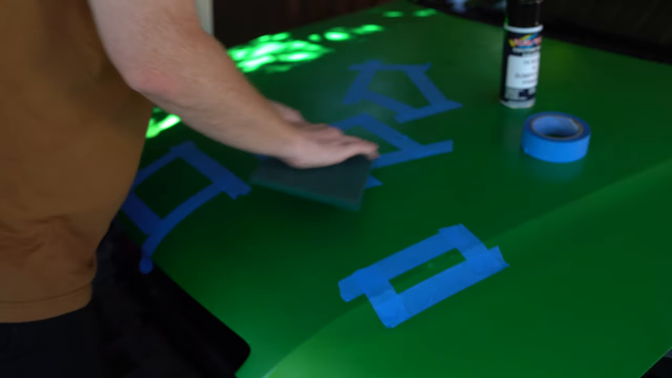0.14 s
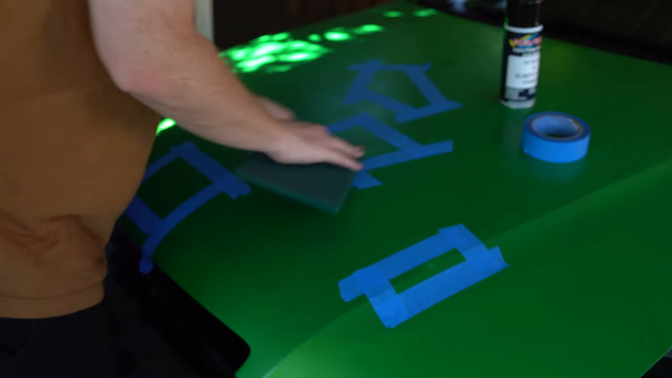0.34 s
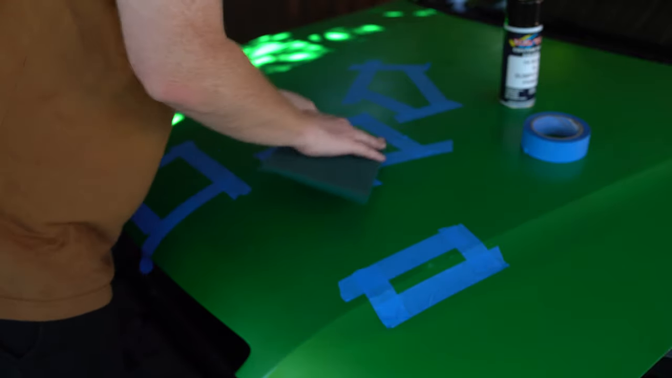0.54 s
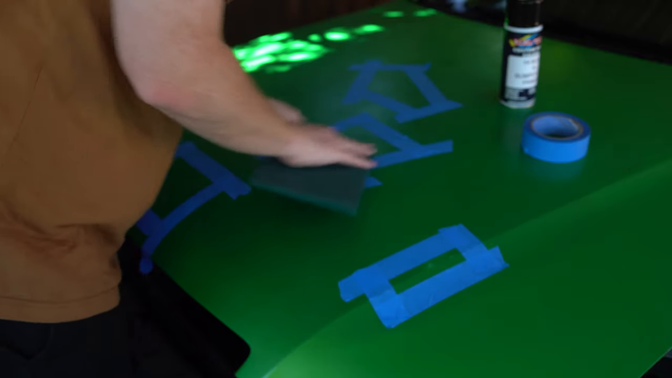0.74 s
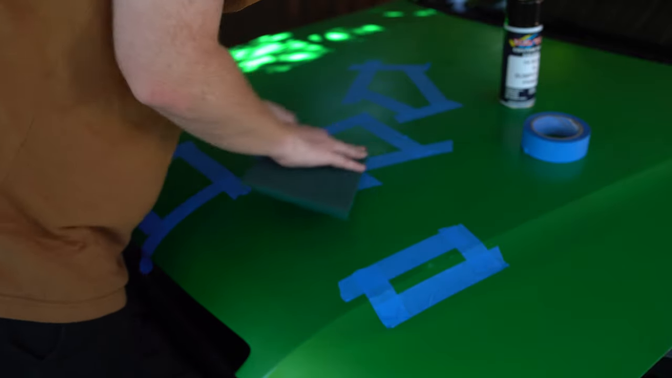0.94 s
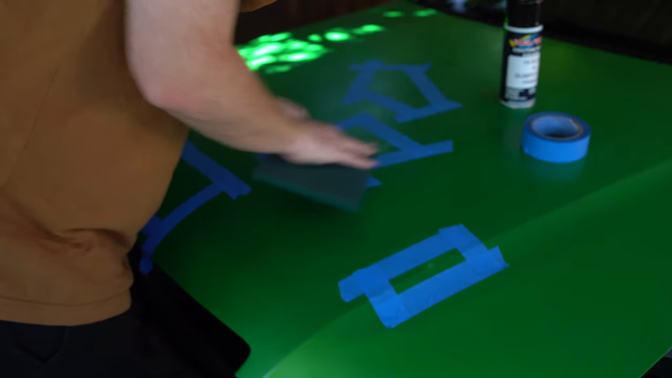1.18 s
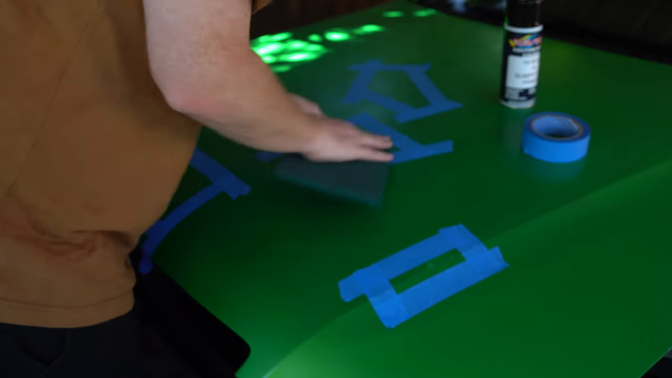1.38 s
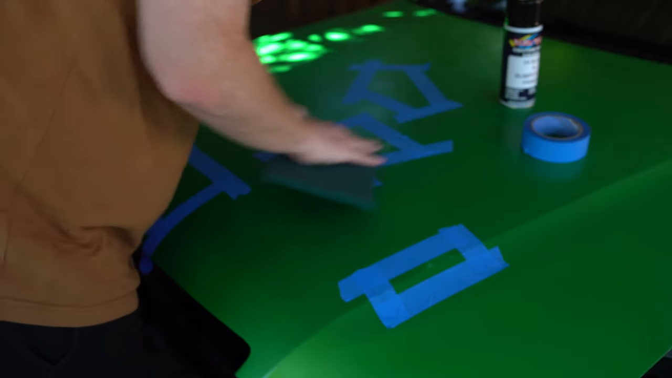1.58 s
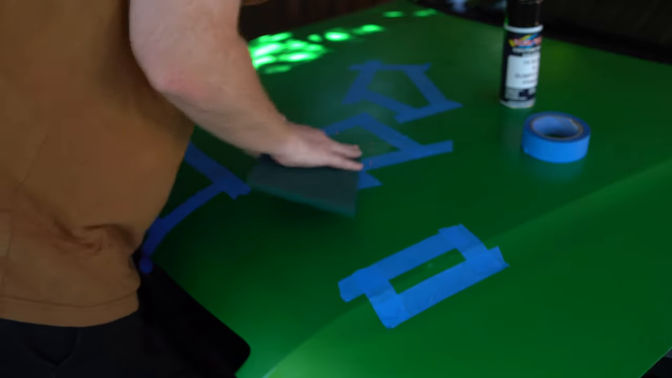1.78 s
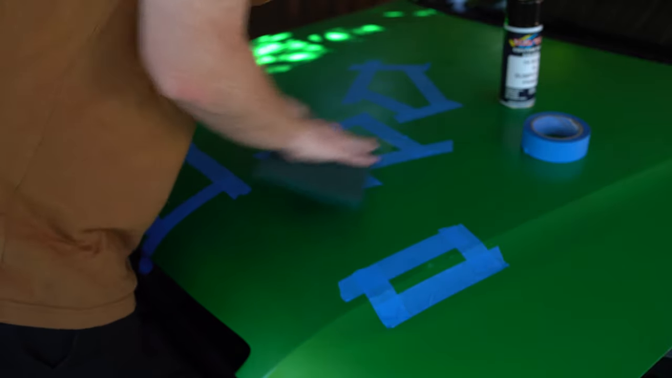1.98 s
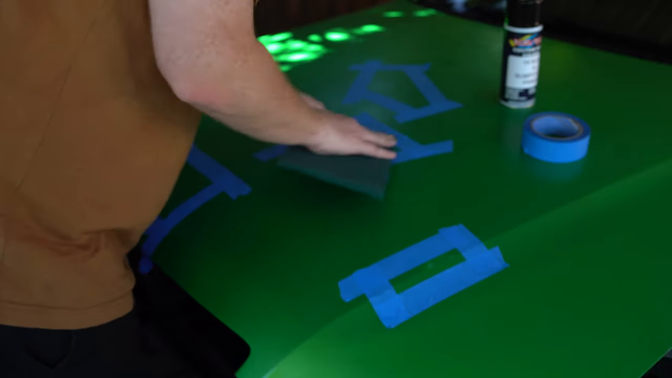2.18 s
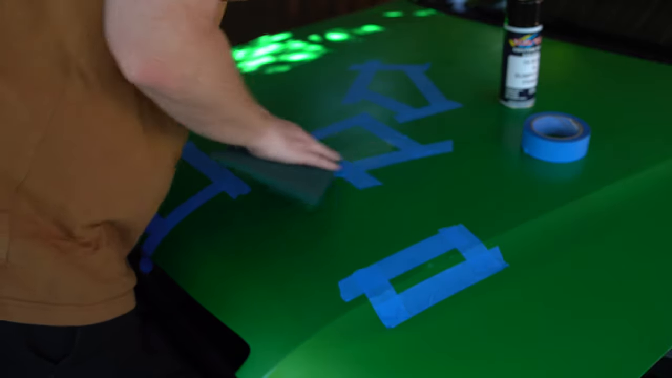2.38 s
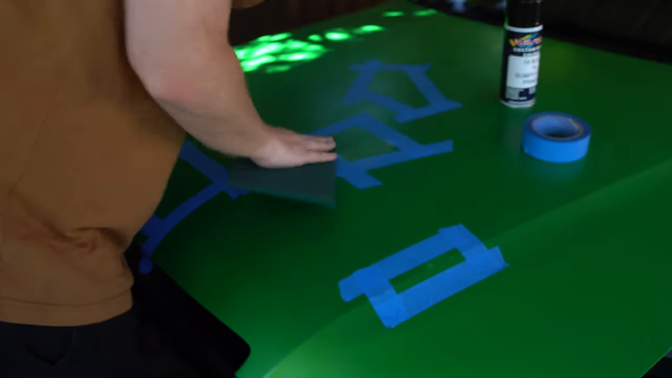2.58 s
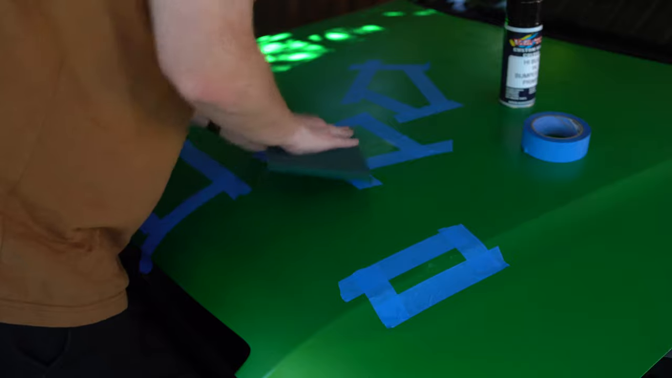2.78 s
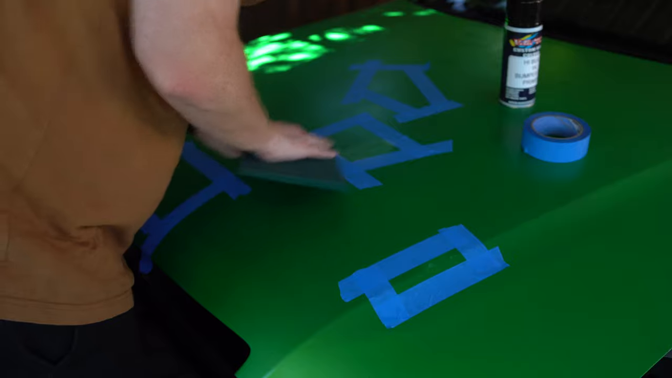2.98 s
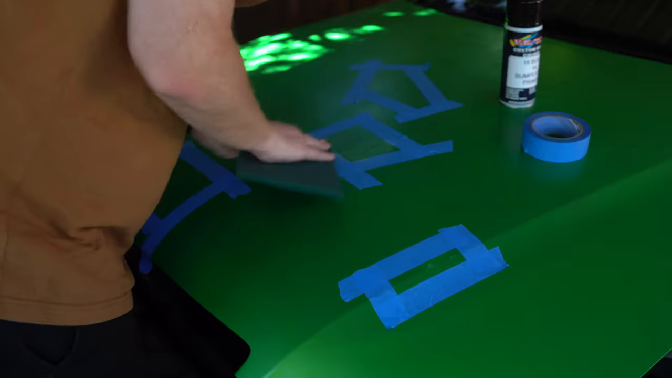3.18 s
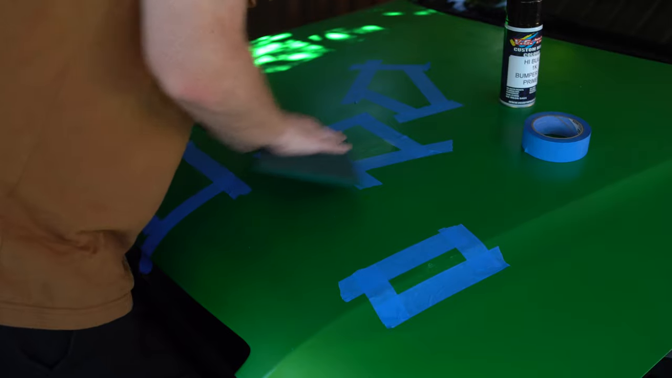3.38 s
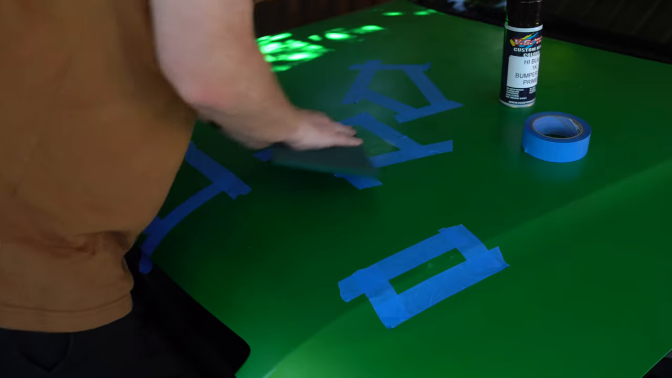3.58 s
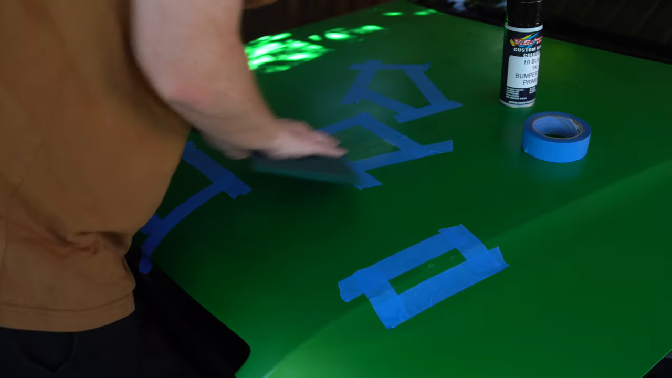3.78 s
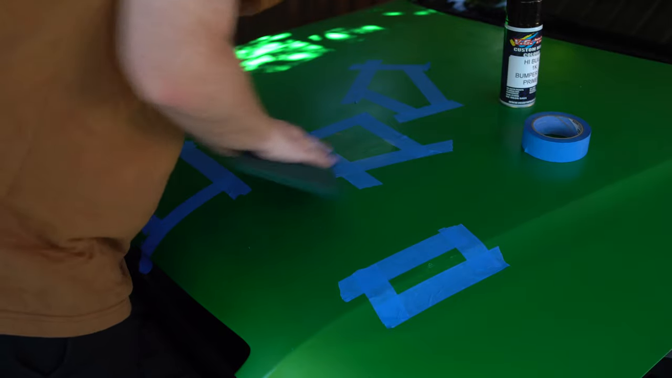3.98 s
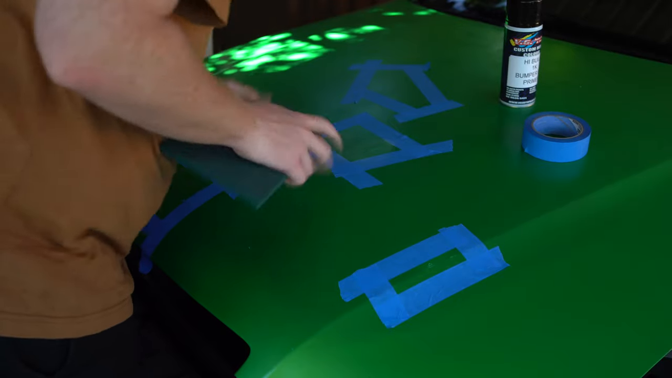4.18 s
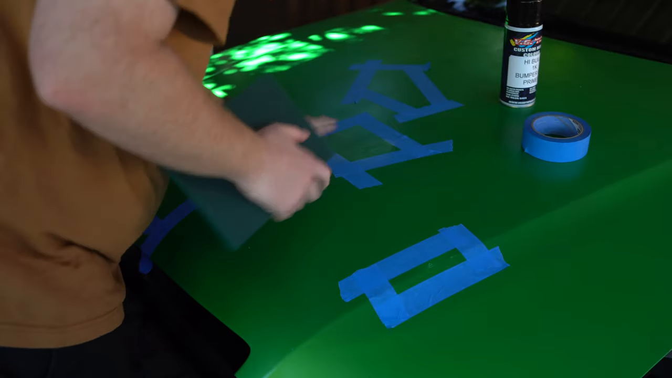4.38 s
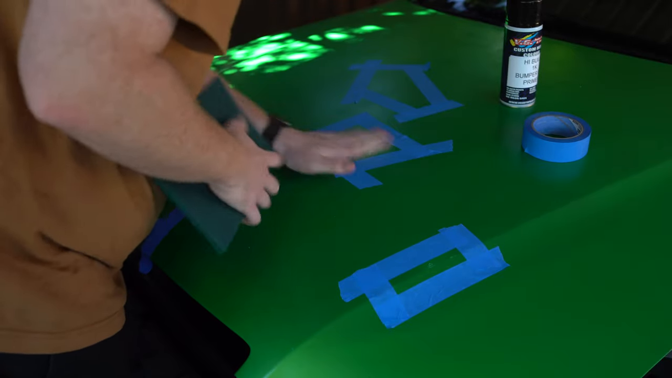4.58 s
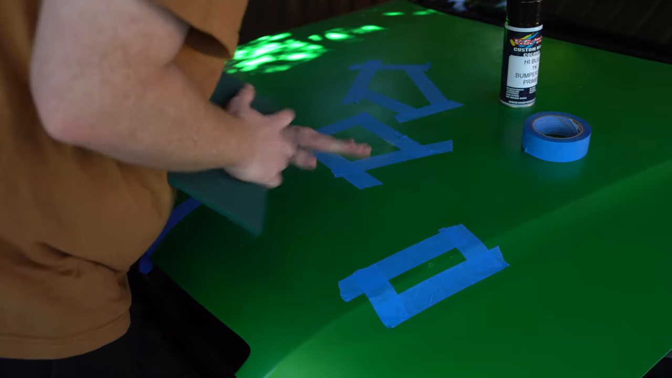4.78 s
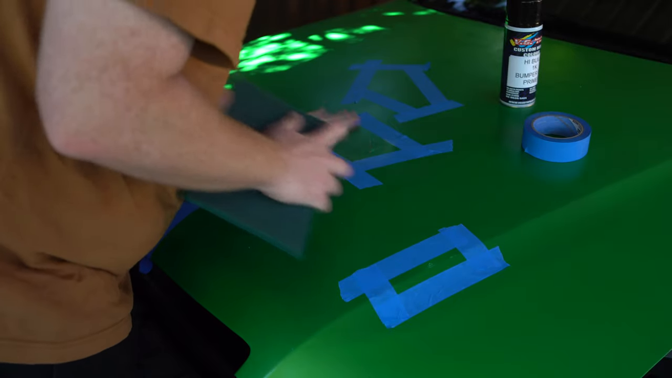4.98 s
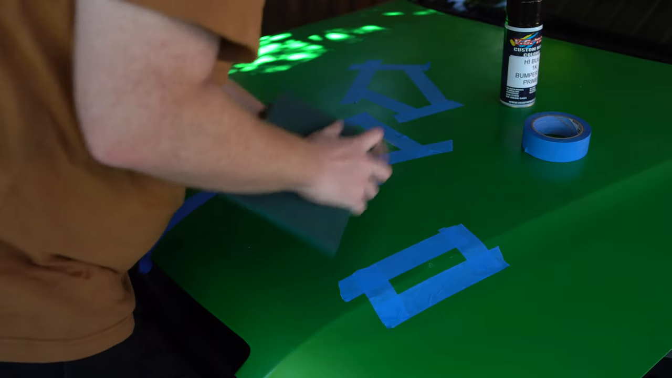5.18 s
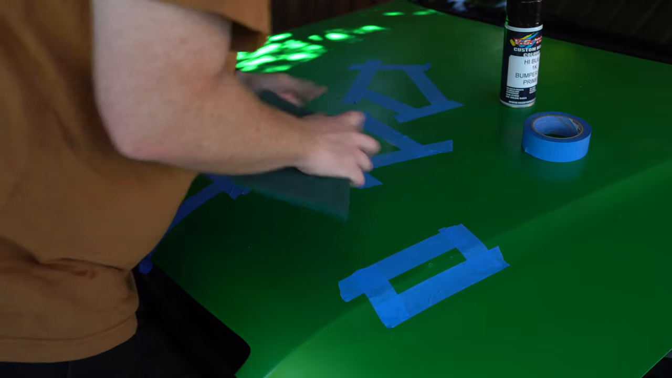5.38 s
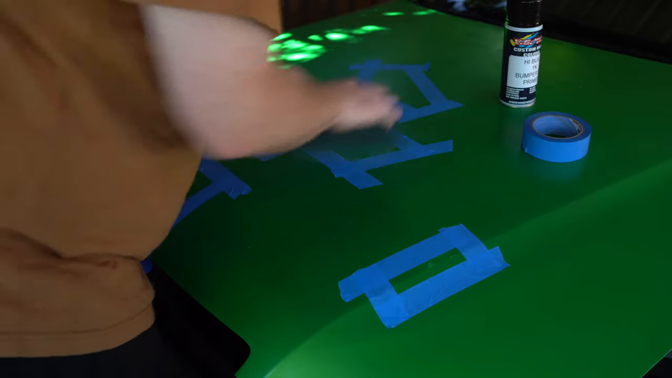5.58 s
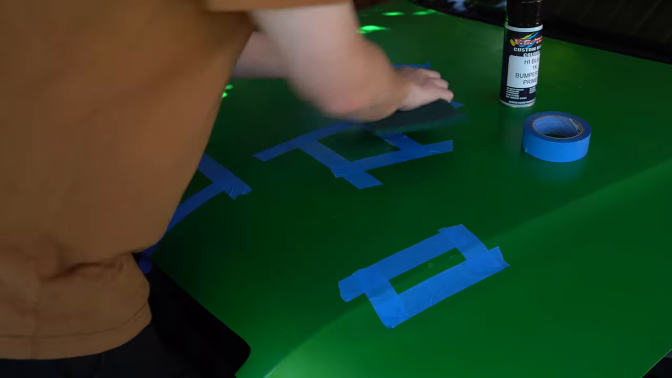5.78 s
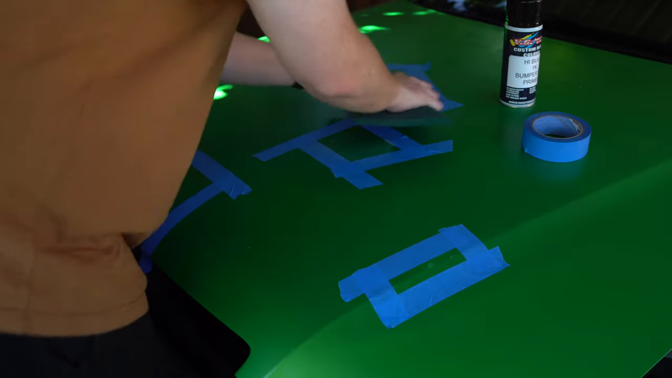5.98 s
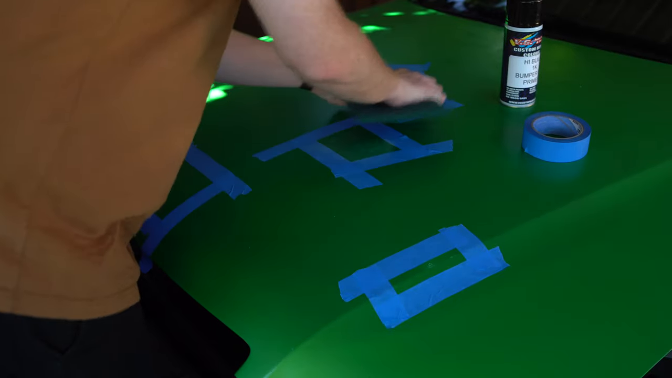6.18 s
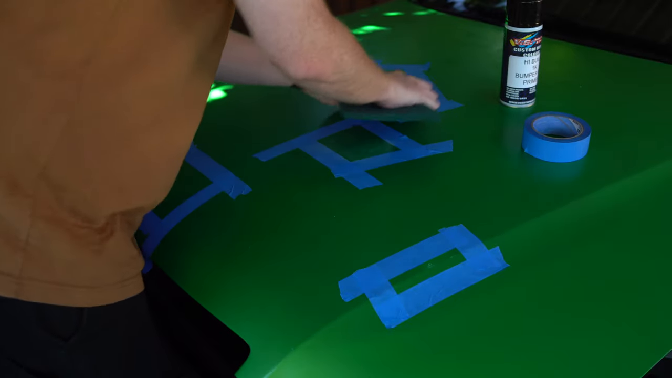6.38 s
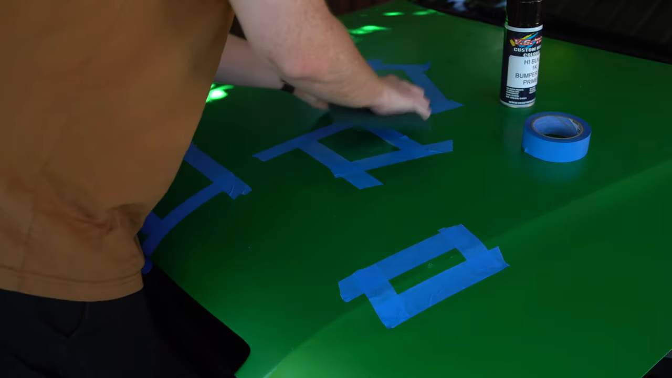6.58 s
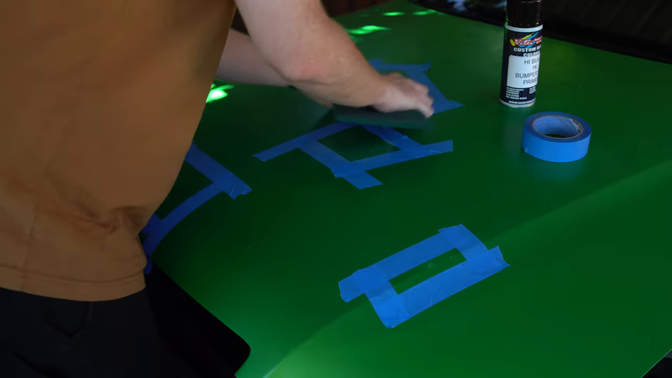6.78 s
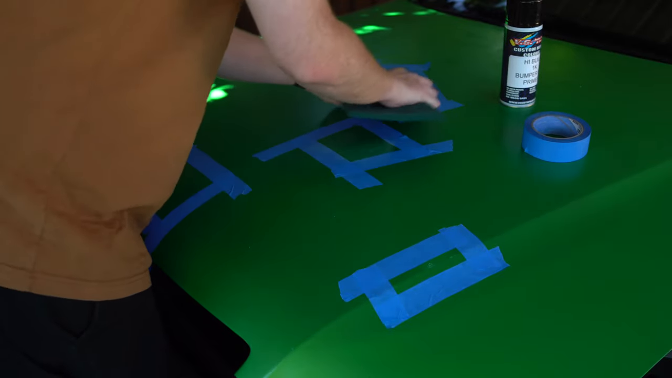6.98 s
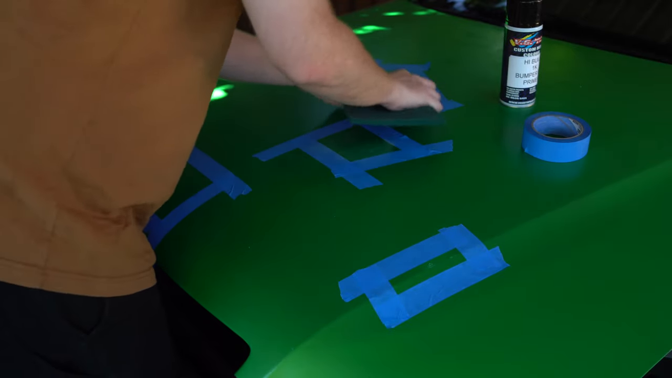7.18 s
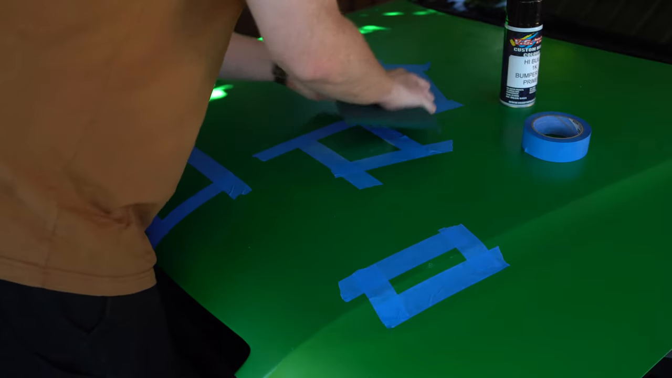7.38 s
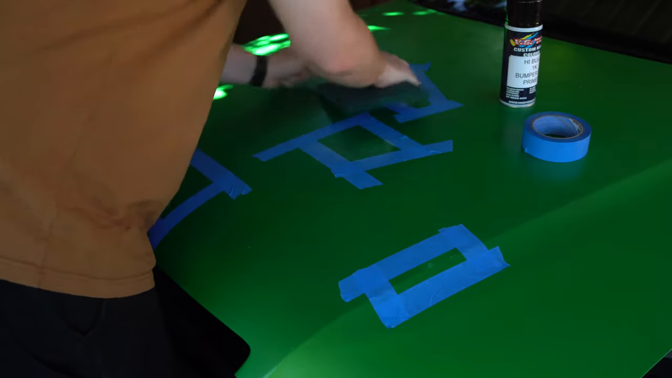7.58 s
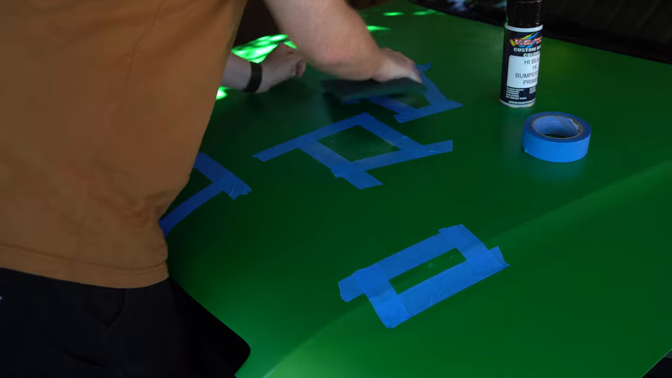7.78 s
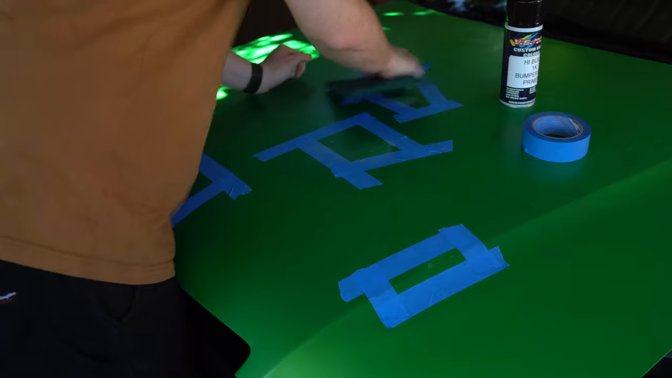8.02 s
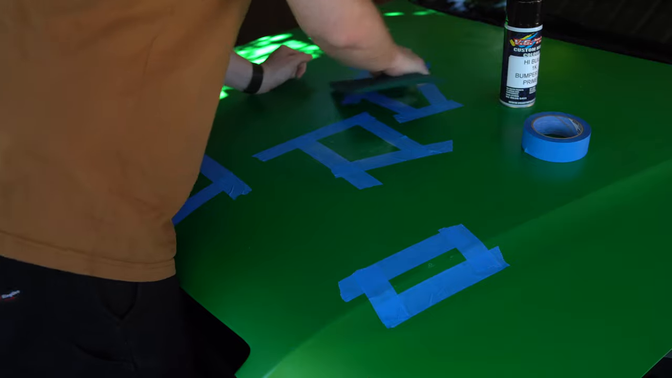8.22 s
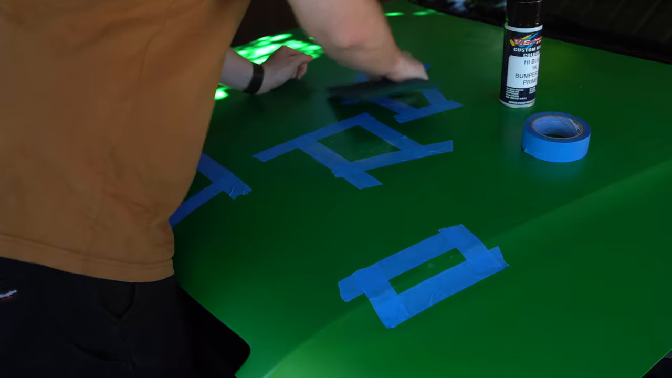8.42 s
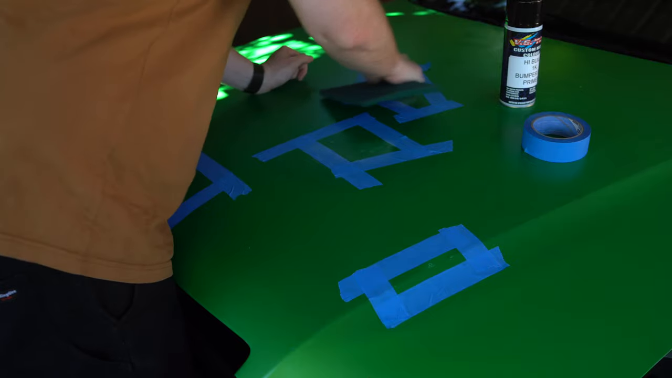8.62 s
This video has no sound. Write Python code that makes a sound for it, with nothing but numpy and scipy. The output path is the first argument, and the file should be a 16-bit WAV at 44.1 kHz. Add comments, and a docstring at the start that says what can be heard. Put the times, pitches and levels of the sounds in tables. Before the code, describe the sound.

Very close, a hand scrubs an abrasive pad to and fro on a painted steel panel, about seven dry, hissing strokes a second with a low hollow drone. After four seconds the pad lifts, a palm wipes softly and fingers tap; scrubbing resumes farther off, pauses briefly and returns. Air from the moving arm thumps and rumbles on the stereo microphone, sometimes clipping, over a faint steady workshop hush.

```python
"""In a workshop, a hand rubs an abrasive pad to and fro over a painted sheet-steel panel, close to two
microphone ports. Each stroke hisses as coloured, grainy noise, scratches in one resonant band and drives the
panel's modes into a drone. Between two patches the pad is lifted and a hand wipes the dust off; a few taps,
faint squeaks and a brief low ring of the sheet stand out. Air stirred by the arm buffets the ports with surges,
puffs and flutter, strongly enough to clip. Behind it lie the short answer of the walls and the steady hush of
the shop."""
import sys
import numpy as np
from scipy import signal
from scipy.fft import rfft, irfft, next_fast_len
from scipy.io import wavfile
from scipy.ndimage import uniform_filter1d, map_coordinates

SR = 44100
rng = np.random.default_rng(int(sys.argv[2]) if len(sys.argv) > 2 else 0)


def store_wav(level_fs):
    """Save 16-bit WAV to argv[1]."""
    pcm = np.round(np.clip(np.atleast_2d(level_fs), -1, 1) * 32767)
    wavfile.write(sys.argv[1], SR, pcm.T.astype(np.int16))


N = 381465

# strokes of the pad, pull and push in turn: (start [s], end [s], hiss [dB], drone over hiss [dB])
PAD_STROKES = [(0.0, 0.113, -54.5, 4), (0.153, 0.265, -49, 5), (0.289, 0.404, -48.5, 1.5),
               (0.447, 0.56, -46, 6.5), (0.597, 0.708, -50, -0.5), (0.744, 0.854, -46, 2.5),
               (0.883, 0.99, -50, 4), (1.026, 1.129, -46.5, 2.5), (1.16, 1.266, -48.5, 3),
               (1.3, 1.402, -44.5, 3.5), (1.434, 1.545, -50, 3), (1.575, 1.68, -46.5, 5.5),
               (1.701, 1.815, -49.5, 6), (1.841, 1.957, -47, 5.5), (1.972, 2.081, -50.5, 4.5),
               (2.11, 2.234, -46.5, 2.5), (2.254, 2.418, -51, 5.5), (2.701, 2.815, -47.5, 4.5),
               (2.841, 2.95, -46, 2.5), (2.998, 3.103, -44.5, 8), (3.129, 3.224, -47.5, 4.5),
               (3.267, 3.365, -47, 7.5), (3.386, 3.485, -48, 1.5), (3.527, 3.628, -46, 6.5),
               (3.65, 3.764, -47.5, 7.5), (3.791, 3.9, -45.5, 8.5), (3.931, 4.055, -48, -1),
               (5.807, 5.914, -56.5, -15), (5.931, 6.036, -53, 8), (6.095, 6.18, -50, 13.5),
               (6.217, 6.308, -50, 11.5), (6.372, 6.466, -51, 14.5), (6.497, 6.577, -49.5, 13),
               (6.641, 6.733, -51, 11.5), (6.766, 6.856, -52, 9.5), (6.901, 6.98, -49.5, 12.5),
               (7.005, 7.126, -54, 11.5), (7.141, 7.212, -54, 16), (7.222, 7.355, -55.5, 8.5),
               (7.803, 7.885, -52, 9), (7.905, 8.0, -49.5, 13.5), (8.033, 8.13, -47, 11),
               (8.155, 8.243, -46.5, -5), (8.262, 8.372, -47.5, 10), (8.397, 8.49, -48, 9.5),
               (8.515, 8.605, -48, -12), (8.63, 8.72, -49, 16.5)]
# wipes and light brushes between the strokes: (start [s], end [s], hiss [dB], hiss rise [dB],
# drone over hiss [dB], scratch resonance [Hz], its end over its start [ratio])
HAND_WIPES = [(2.588, 2.63, -63, 0.3, -1, 2050, 0.97), (4.14, 4.43, -73, 13, -3, 2390, 0.66),
              (4.436, 4.562, -54, 5, -1, 1810, 0.78), (4.553, 4.718, -53, 5.5, -0.5, 1740, 1.27),
              (4.918, 5.037, -56, 6, -2.5, 1820, 1.4), (5.067, 5.166, -55.5, 5.5, 5.5, 2230, 1.13),
              (5.644, 5.788, -69, -2, 6.5, 3100, 0.67), (7.393, 7.63, -61, 7.5, 6, 7200, 2),
              (7.641, 7.708, -59, -0.5, 11, 7440, 1.3), (7.714, 7.766, -62, 5.5, 24.5, 3400, 1)]
# when the hand takes a new hold of the pad: (time [s])
HOLD_STARTS = [0, 1.0, 2.6, 3.5, 5.7, 6.05, 6.6, 7.13, 7.5]
# each hold: (hiss rise along a pull [dB], along a push [dB], scratch resonance of a pull [Hz],
# of a push [Hz], scratch of a push over hiss [dB])
HOLDS = [(4, -0.5, 1820, 2220, -7), (0, -2, 6750, 4320, -7), (11.5, -1.5, 3200, 3170, -6.5),
         (5, -4, 3200, 8400, -9.5), (8.5, -1, 6500, 3570, -0.5), (8.5, -0.5, 6800, 6000, -6.5),
         (5.5, -2, 7000, 6300, -2.5), (0.5, -2, 6800, 5950, 7), (1, 0, 6900, 8000, -5.5)]
PULL_SCRATCH_DB, WIPE_SCRATCH_DB = -7.5, -0.5  # scratch over hiss


def contacts():
    """Every rub on the sheet, wipes first: its times, levels, resonance, glide and direction (push is 1)."""
    rubs = []
    for start, end, db, rise_db, over_db, hz, glide in HAND_WIPES:
        rubs.append(dict(start=start, end=end, hiss_db=db, rise_db=rise_db, drone_db=db + over_db,
                         scratch_hz=hz, glide=glide, scratch_db=db + WIPE_SCRATCH_DB, push=0))
    for k, (start, end, db, over_db) in enumerate(PAD_STROKES):
        push = k % 2
        hold = HOLDS[np.searchsorted(HOLD_STARTS, start, side="right") - 1]
        scratch_db = db + (hold[4] if push else PULL_SCRATCH_DB)
        rubs.append(dict(start=start, end=end, hiss_db=db, rise_db=hold[push], drone_db=db + over_db,
                         scratch_hz=hold[2 + push], glide=1, scratch_db=scratch_db, push=push))
    return rubs


# how many times more gently the pad turns on each patch, rounder at a farther reach: (factor [ratio])
TURN_EASE = [1.16, 1.2, 1.37, 2.449]


def stroke_gain(rub, level, grip_s, lift_s, bite_db, lean=1):
    """Span and gain of one stroke: the pad grips, slides fastest in the middle and slows at the turn."""
    start, end, rise_db = rub["start"], rub["end"], lean * rub["rise_db"]
    span = slice(max(0, int((start - .08) * SR)), min(N, int((end + .12) * SR)))
    t = np.arange(span.start, span.stop) / SR
    # a stroke that fades was jerked off: faster grip, and a bite as the fibres catch
    jerk = np.clip(-rise_db / 2.2, 0, 1)
    bite = bite_db * jerk * np.exp(-abs(t - start - .01) / 0.012)
    ease = TURN_EASE[np.searchsorted(PATCH_MOVES, start)]
    slow = (end - start) / .1  # a longer stroke starts more gently
    onset_s = slow * ease * grip_s * (1 - .6 * jerk)
    edge = 1 / (1 + np.exp((start - t) / onset_s)) / (1 + np.exp((t - end) / (ease * lift_s)))
    along_stroke = np.clip((t - start) / (end - start) - .5, -.5, .5)
    arch = -6 * along_stroke ** 2
    return span, amp(rub[level] + rise_db * along_stroke + arch + bite) * edge


# when the hand changes its patch: (time [s])
PATCH_MOVES = [4.1, 5.92, 7.4]


def patch_gains(level, **shape):
    """Gain over time of the named level, as (pull or push, patch of the panel, sample)."""
    gains = np.zeros((2, len(PATCH_MOVES) + 1, N))
    for rub in contacts():
        span, gain = stroke_gain(rub, level, **shape)
        gains[rub["push"], np.searchsorted(PATCH_MOVES, rub["start"]), span] += gain
    return gains


# hiss colours at the near patch, of the wiping hand, at the far patch and beside it:
# (frequency [Hz], relative density [dB per Hz])
NEAR_COLOUR = [(900, -2), (2230, -1.5), (2770, -5.5), (3160, -5), (3730, -8.5), (4100, -5.5), (4900, -8),
               (7740, -8.5), (12200, -14), (15700, -24.5)]
WIPE_COLOUR = [(1000, 0.5), (1820, -3.5), (3550, -9), (7940, -12), (13000, -19.5), (15700, -29)]
FAR_COLOUR = [(900, 15.5), (1400, 9.5), (2500, 2), (4850, -2), (5900, 3.5), (7000, 1), (11000, -4),
              (15700, -12)]
BESIDE_COLOUR = [(900, 1), (1560, -7), (3080, -10.5), (8510, -13.5), (10900, -13), (15700, -31.5)]


def hiss():
    """Countless grit contacts: noise with dense grains, coloured by the hand over the pad."""
    grains = amp(1.2 * wobble(900) + .7 * wobble(40))
    grit = unit(patchy(patchy_db=2) * grains)
    gains = patch_gains("hiss_db", grip_s=0.0039, lift_s=0.0064, bite_db=0.0).sum(axis=0)
    band = lambda hz: (hz > 2500) & (hz < 13000)  # hiss levels count this band
    out = 0
    for gain, points in zip(gains, (NEAR_COLOUR, WIPE_COLOUR, FAR_COLOUR, BESIDE_COLOUR)):
        colour = closed(points)
        out = out + gain * filtered(grit, colour) / unit_gain(lambda hz: band(hz) * colour(hz))
    return out


SCRATCH_SCATTER = .035  # spread of the resonance from stroke to stroke, as a share


def scratch():
    """The gap between hand, pad and paint favours one band, set by the hold on the pad; in a wipe it slides."""
    out, grit, rubs = np.zeros((2, N)), patchy(patchy_db=3.5), contacts()
    for k, (rub, luck) in enumerate(zip(rubs, rng.standard_normal(len(rubs)))):
        is_wipe = k < len(HAND_WIPES)
        lean = .3 if is_wipe else 1  # the rasp of a palm comes at once
        span, gain = stroke_gain(rub, "scratch_db", grip_s=.003, lift_s=.012, bite_db=6, lean=lean)
        t = np.arange(span.start, span.stop) / SR
        place = np.clip((t - rub["start"]) / (rub["end"] - rub["start"]), 0, 1)
        stops = 5 if is_wipe else 1  # a sliding band crossfades through several resonances
        band = 0
        for stop in np.linspace(0, 1, stops):
            share = np.sqrt(np.clip(1 - (stops - 1) * abs(place - stop), 0, 1))
            hz = rub["scratch_hz"] * rub["glide"] ** (stop - .5) * np.exp(SCRATCH_SCATTER * luck)
            b, a = signal.iirpeak(hz, 2 + 7500 / hz, SR)  # low scratches squeak more sharply
            once = signal.lfilter(b, a, grit[:, span])
            band = band + share * signal.lfilter(b, a, once)
        out[:, span] += gain * unit(band)
    return out


# panel modes: (frequency [Hz], width [Hz], drive from each of the four patches [dB] x 4,
# change in a full push [dB])
PANEL_MODES = [(210, 240, -1.5, 2, -7, 0, -4.5), (355, 112, 5, 7, -1, 0.5, -1.5),
               (418.7, 55.6, 4.5, 10.5, 2.5, 0, -0.3), (558, 113, 0, 1, -2.5, -3.5, -1),
               (702, 107, 0.5, 5.5, -6, -6.5, 2.5), (870, 290, -4, -1, -10.5, -28, 1),
               (967, 21, -8, -22, -5, -28.5, 0.5)]
PUSH_SHARE = 0.9  # share of a full push's change that is used
# fingers or pad land on the sheet: (time [s], peak of the push on the sheet [dB])
SHEET_TAPS = [(4.416, -35), (4.635, -37), (4.917, -32), (5.884, -34), (8.037, -29)]


def panel_response(hz, patch, push):
    """The sheet as a row of resonances of alternating sign, driven from one patch."""
    total = 0
    for n, mode in enumerate(PANEL_MODES):
        centre, width = mode[:2]
        gain = (-1) ** n * amp(mode[2 + patch] + push * mode[-1])
        total = total + gain * 1j * hz * width / (centre ** 2 - hz * hz + 1j * hz * width)
    return total


def drone():
    """The drag shakes the sheet unevenly, taps knock it, and its modes answer."""
    gains = patch_gains("drone_db", grip_s=0.013, lift_s=0.017, bite_db=4.0, lean=2.32)
    t, taps = np.arange(N) / SR, np.zeros_like(gains[0])
    for at, db in SHEET_TAPS:
        decay_db = 60 * abs(t - at) / 0.25
        taps[np.searchsorted(PATCH_MOVES, at)] += amp(db - decay_db) * (t > at)
    flesh = lambda hz: 1 / (1 + 1j * hz / 450) ** 2  # a soft contact reaches mainly the low modes
    drag = unit(patchy(patchy_db=2) * amp(1.2 * wobble(30)))
    out = 0
    for patch, (pull, push) in enumerate(zip(*gains)):
        pull_sheet = lambda hz: panel_response(hz, patch, 0)
        push_sheet = lambda hz: panel_response(hz, patch, PUSH_SHARE)
        knocks = filtered(taps[patch] * drag, flesh)
        pulled = filtered(pull * drag + knocks, pull_sheet)
        pushed = filtered(push * drag, push_sheet)
        out = out + (pulled + pushed) / unit_gain(pull_sheet)
    return out


# faint narrow tones, squeaks of the pad and a low ring of the sheet at 220 Hz: (start [s], end [s], centre
# frequency [Hz], peak before flicker [dB])
FAINT_TONES = [(.03, .14, 1700, -54), (.27, .39, 1690, -55), (2.5, 2.59, 2620, -66),
               (7.41, 7.62, 220, -52)]


def faint_tones():
    """Faint wavering tones that swell and fade: slips of the pad at a nearly steady rate, and at 7.4 s a low
    ring of the sheet."""
    t, out = np.arange(N) / SR, np.zeros(N)
    drift = np.cumsum(wobble(120)) / SR
    flicker = amp(4 * wobble(90))
    for start, end, hz, db in FAINT_TONES:
        swell = np.sin(np.pi * np.clip((t - start) / (end - start), 0, 1))
        out += amp(db) * swell * np.sin(2 * np.pi * hz * (t + .022 * drift))
    return out * flicker


# slow air on the ports, before puffs swell it: (time [s], surge [dB], left over right [dB])
AIR_SURGE = [(0.0, -20.5, 5), (0.19, -29.5, 3), (0.31, -21, -5), (0.89, -22.5, 6), (1.03, -16, -1),
             (2.65, -22.5, 5), (2.74, -30.5, -3), (2.89, -17, -4), (3.73, -21, -2), (5.5, -30, -5),
             (5.65, -20, 5), (5.83, -25, 1.5), (8.65, -28.5, -2)]
# puffs off the arm: (time [s], suction [dB], left over right [dB], flutter [dB])
ARM_PUFFS = [(0.609, -10.5, 5.5, -32), (0.932, -8.5, 3, -50), (1.191, -2.5, -0.5, -34), (1.46, -11, 7, -35),
             (1.716, -1.5, 7, -22.5), (1.978, -5.5, 6.5, -19), (2.063, -7.5, 8, -45),
             (2.244, -11, -5, -16.5), (2.536, -5, 4.5, -25.5), (2.622, -7, 8, -37.5), (3.197, -1, 4, -28),
             (3.417, -2.5, -3, -15), (3.69, -1.5, 7, -26.5), (3.927, 0.5, 4.5, -20), (4.226, -1, -1, -17.5),
             (4.311, -9, 0, -37), (5.202, -12, -9.5, -36), (5.651, -5.5, 17.5, -59),
             (6.219, -14, -15, -39.5), (6.766, -6.5, -11, -31), (8.349, -21, -6, -28)]
# colours of surge and flutter: (frequency [Hz], relative density [dB per Hz])
SURGE_COLOUR = [(3, -0.5), (7, 0), (13, 5.5), (25, -5), (45, -10.5), (90, -30), (400, -120)]
FLUTTER_COLOUR = [(30, -71), (55, 1), (120, -11), (250, -30.5), (1500, -96)]
PUFF_MS, PUFF_SCATTER = 15.24, 0.2  # typical width of a puff, and its scatter as a share
SKEW_S = 0.0113  # scatter of arrival between the ports
FLUTTER_PAN = 0.95  # share of a puff's lean that its flutter keeps
STILL_DB = -27  # around and below this surge the air presses one port as it draws on the other


def buffet():
    """Eddies differ from port to port: a slow surge, single puffs and the lumpy flutter around them."""
    s, surge_db, pan_db = np.transpose(AIR_SURGE)
    t, lean = np.arange(N) / SR, np.array([[.5], [-.5]])
    surge_line = np.interp(t, s, surge_db)
    surge = amp(surge_line + lean * np.interp(t, s, pan_db))
    puffs, puff_swell, stir = np.zeros((2, N)), np.ones((2, N)), amp(-22.5) * surge
    lucks = rng.standard_normal((len(ARM_PUFFS), 2, 2))
    for (at, db, side_db, flutter_db), luck in zip(ARM_PUFFS, lucks):
        near = slice(int((at - .25) * SR), int((at + .25) * SR))
        since = t[near] - at
        width_s = PUFF_MS / 1000 * np.exp(PUFF_SCATTER * luck[1][:, None])
        u = (since - SKEW_S * lean * luck[0, 0]) / width_s
        # the port's vent lets the pressure swing back
        puffs[:, near] -= amp(db + lean * side_db) * (1 - 1.89 * u * u) * np.exp(-.9 * u * u)
        # the surge swells around a strong puff
        puff_swell[:, near] *= 1 + 1.32 * amp(db) * np.exp(-(since / 0.068) ** 2)
        flutter = amp(flutter_db + FLUTTER_PAN * lean * side_db)
        stir[:, near] += flutter * np.exp(-((since + 0.012) / 0.042) ** 2)
    # how far the two ports move in opposition, 0 to 1
    opposed = 1 / (1 + amp(4.9 * (surge_line - STILL_DB)))
    couple = lambda x: np.array([x[0], np.sqrt(1 - opposed ** 2) * x[1] - opposed * x[0]])
    eddy = lambda colour: couple(unit(filtered(rng.standard_normal((2, N)), closed(colour))))
    puffs[1] *= 1 - 2 * opposed
    lumps = amp(2.5 * np.array([wobble(25), wobble(25)]))
    swell = amp(1.17 * np.array([wobble(2.213), wobble(6.7)]))
    slow_air = surge * puff_swell * unit(swell * eddy(SURGE_COLOUR))
    return slow_air + puffs + stir * unit(lumps * eddy(FLUTTER_COLOUR))


# decay of the shop's answer: (frequency [Hz], time to fall 60 dB [s])
WALL_DECAY = [(200, 1), (2000, 0.57), (10000, 0.075)]


def walls(x):
    """Each frequency of the shop's answer dies at its own speed."""
    hz, t, z = signal.stft(rng.standard_normal((2, SR // 2)), SR, nperseg=256)
    fade = amp(-60 * t / along(WALL_DECAY, hz)[:, None])
    tail = signal.istft(z * fade, SR, nperseg=256)[1]
    return signal.fftconvolve(x, tail / np.linalg.norm(tail[0]), axes=1)[:, :N]


# colour of the shop's hush: (frequency [Hz], relative density [dB per Hz])
SHOP_COLOUR = [(150, 7), (300, -2), (850, -3.5), (3500, -25.5), (6000, -27.5), (10000, -24.5), (15700, -38)]
SHOP_DB = -53.5  # rms


def shop():
    """The steady air of the workshop, heard by both ports, and the microphone's own hiss."""
    room_air = unit(spread(patchy(patchy_db=2.5)))
    own_hiss = 0.7 * rng.standard_normal((2, N))
    return amp(SHOP_DB) * unit(filtered(room_air + own_hiss, closed(SHOP_COLOUR)))


# likeness of the ports: (frequency [Hz], left-right correlation before tilt and lead [ratio])
PORT_LIKENESS = [(800, 0.85), (3500, 0.65), (7500, 0.72), (11000, 0.35)]
# balance of the ports: (frequency [Hz], left over right [dB])
PORT_TILT = [(300, -2.5), (4400, 1), (15000, -3)]
# phase of the ports: (frequency [Hz], lead of the left [radians])
PORT_LEAD = [(300, 1.6), (1500, 0.9), (4000, 0.5), (7500, .1), (12000, 1.3)]


def spread(pair):
    """Two unrelated sounds mixed to the likeness, balance and phase of the ports."""
    turn = lambda hz: np.arccos(np.clip(along(PORT_LIKENESS, hz), -1, 1)) / 2
    mid, side = filtered(pair, lambda hz: np.array([np.cos(turn(hz)), np.sin(turn(hz))]))
    halves = [.5, -.5]
    balance = lambda hz: amp(np.outer(halves, along(PORT_TILT, hz)))
    phase = lambda hz: np.exp(1j * np.outer(halves, along(PORT_LEAD, hz)))
    return filtered(np.array([mid + side, mid - side]), lambda hz: balance(hz) * phase(hz))


def patchy(patchy_db):
    """Two noises that share patches of random gain over time and frequency."""
    z = signal.stft(rng.standard_normal((2, N)), nperseg=512)[2]
    field = uniform_filter1d(rng.standard_normal(z.shape[1:]), 5, 0)
    field = uniform_filter1d(field, 8, 1)
    return signal.istft(z * amp(patchy_db * unit(field)), nperseg=512)[1][:, :N]


def wobble(rate):
    """A smooth random curve, rate knots a second."""
    knots = rng.standard_normal(int(N * rate / SR) + 4)
    return map_coordinates(knots, [np.arange(N) * rate / SR])


def filtered(x, response):
    """x times a complex response of frequency."""
    m = next_fast_len(N + SR // 2)
    return irfft(rfft(x, m) * response(np.fft.rfftfreq(m, 1 / SR)), m)[..., :N]


def closed(points):
    """Gain of a spectrum that falls away below its first point."""
    return lambda hz: amp(along([(points[0][0] / 4, -90)] + list(points), hz))


def along(points, hz):
    """Value at hz, read between (Hz, value) points on a log axis."""
    f, v = np.transpose(points)
    return np.interp(np.log(hz + 1), np.log(f + 1), v)


def unit_gain(response):
    """Rms that white noise of rms 1 keeps after a response."""
    return np.sqrt(np.mean(np.abs(response(np.fft.rfftfreq(SR, 1 / SR))) ** 2))


def unit(x):
    """x at rms 1."""
    return x / np.sqrt(np.mean(x ** 2) + 1e-20)


def amp(db):
    """Gain of a level in dB."""
    return 10 ** (np.asarray(db) / 20)


def scene():
    """Pad and panel in the room, with the air on the ports."""
    rub = spread(hiss() + scratch() + drone() + faint_tones())
    return rub + amp(-12.5) * walls(rub) + buffet() + shop()


TOP_HZ = 15800  # band limit


def record(dry):
    """The converter clips at full scale, then everything above the band limit is cut."""
    clipped = dry / (1 + np.abs(dry) ** 12) ** (1 / 12)
    return filtered(clipped, lambda hz: hz < TOP_HZ)


dry = scene()
out = record(dry)
store_wav(out)
```